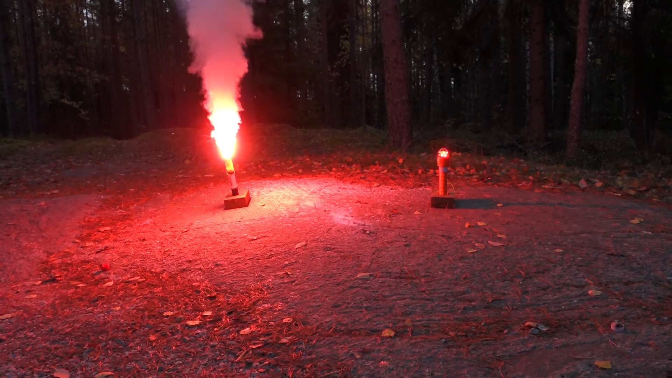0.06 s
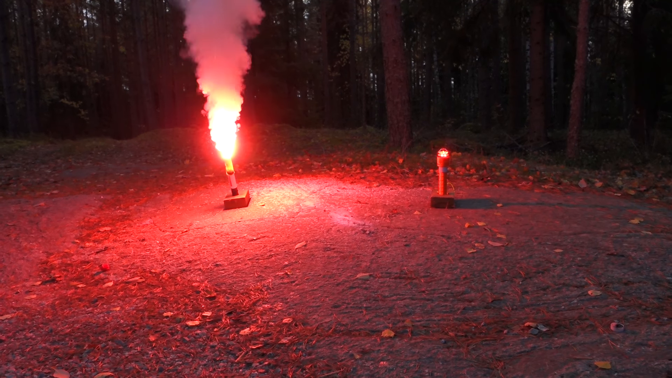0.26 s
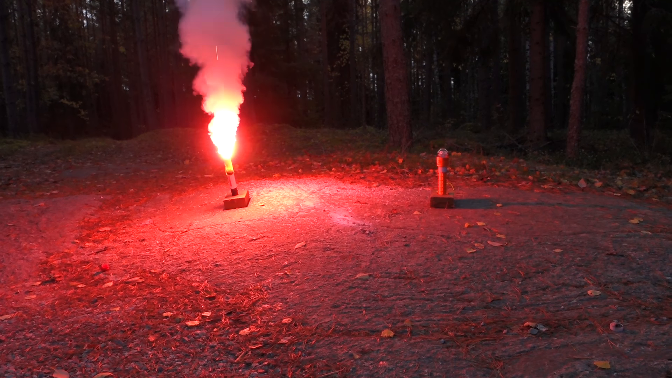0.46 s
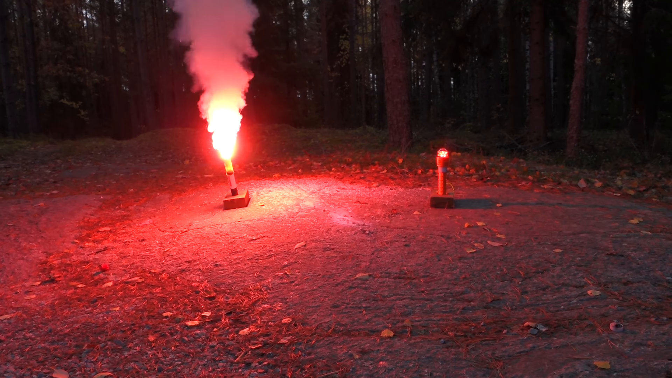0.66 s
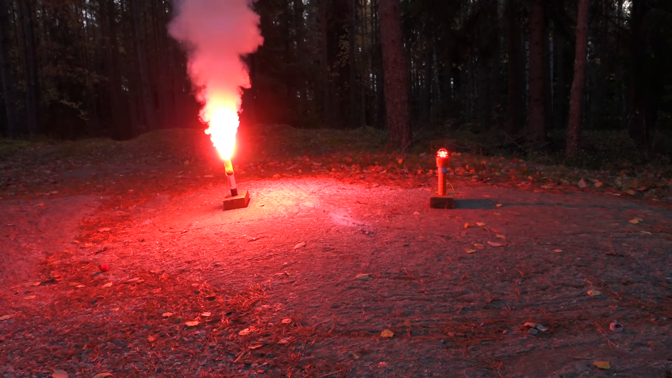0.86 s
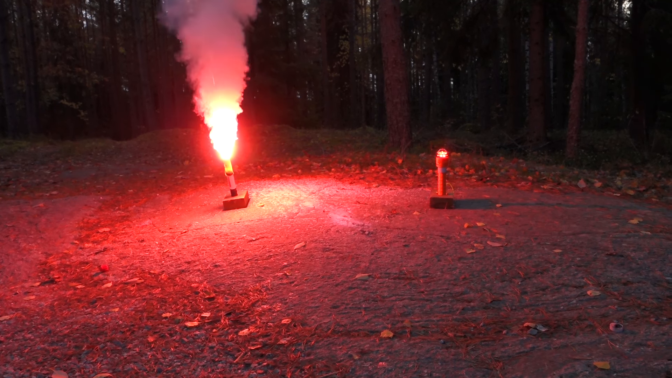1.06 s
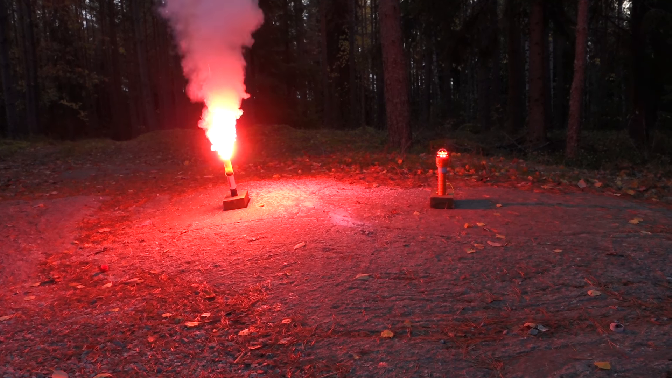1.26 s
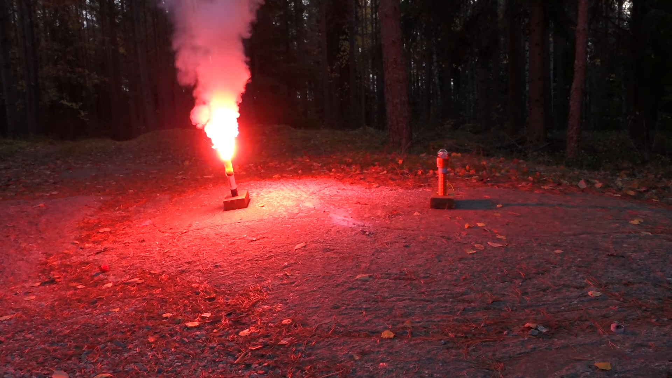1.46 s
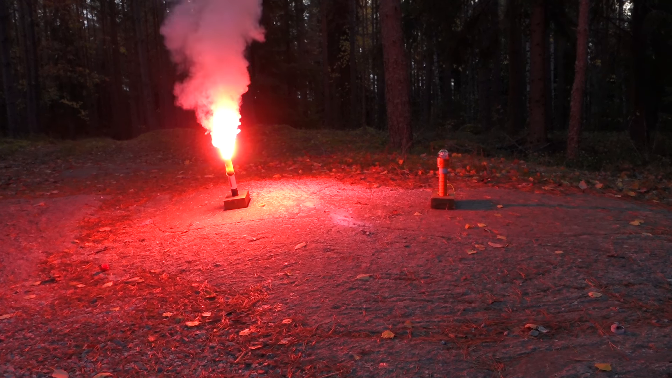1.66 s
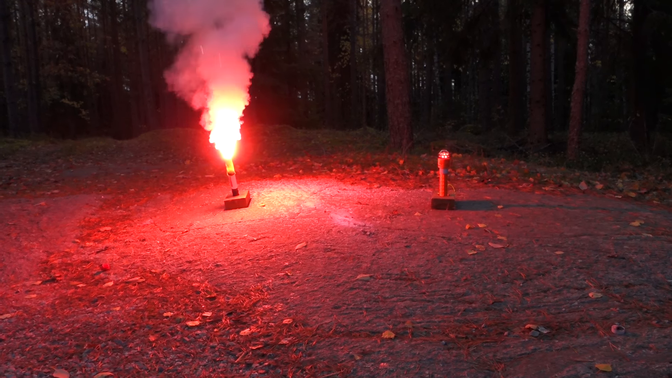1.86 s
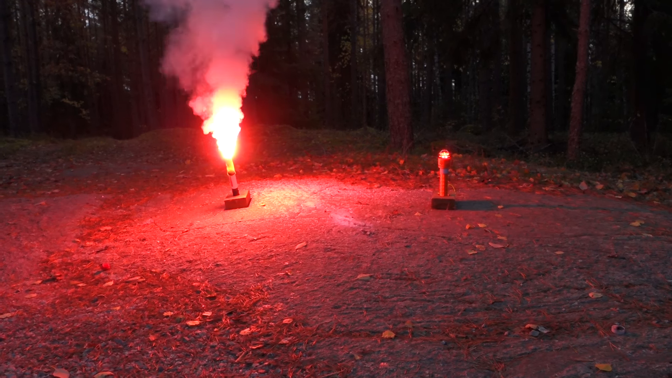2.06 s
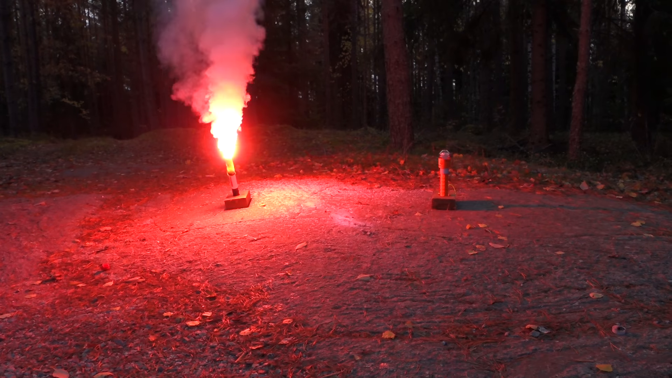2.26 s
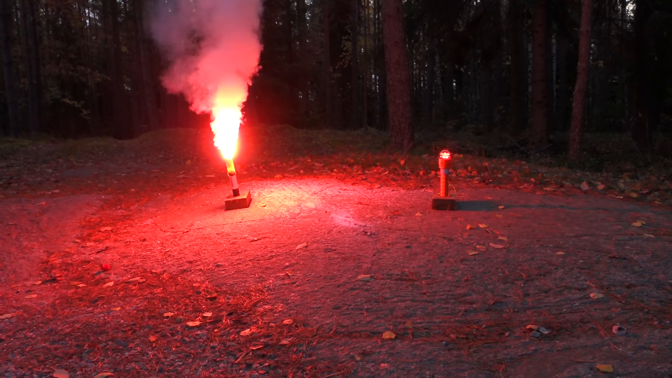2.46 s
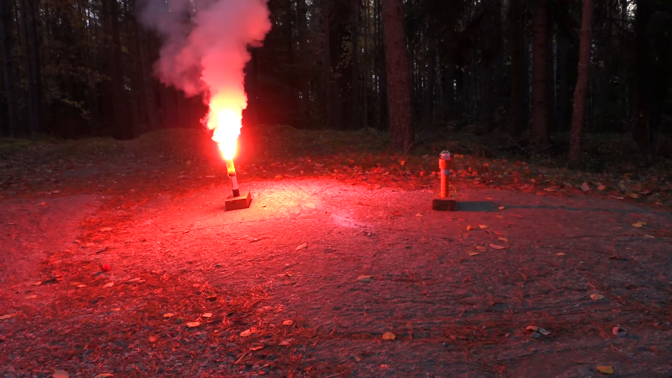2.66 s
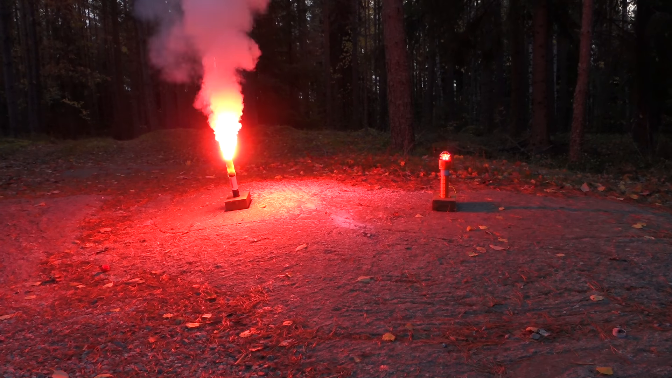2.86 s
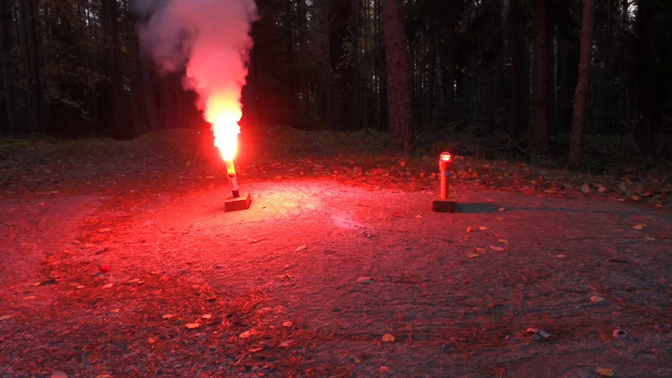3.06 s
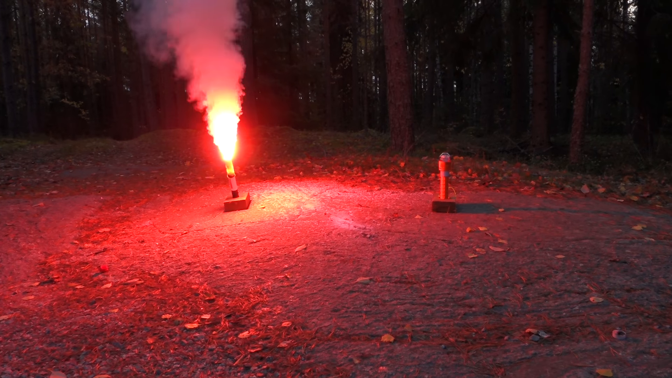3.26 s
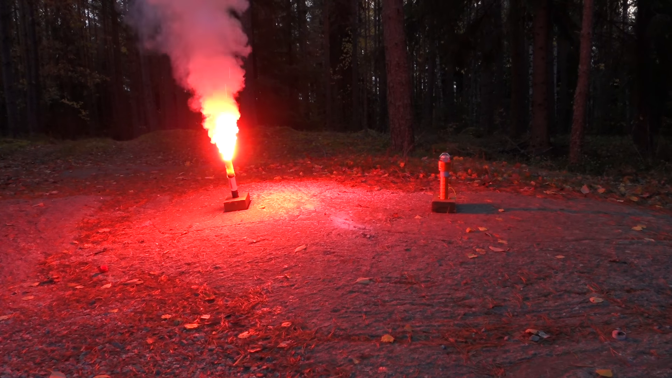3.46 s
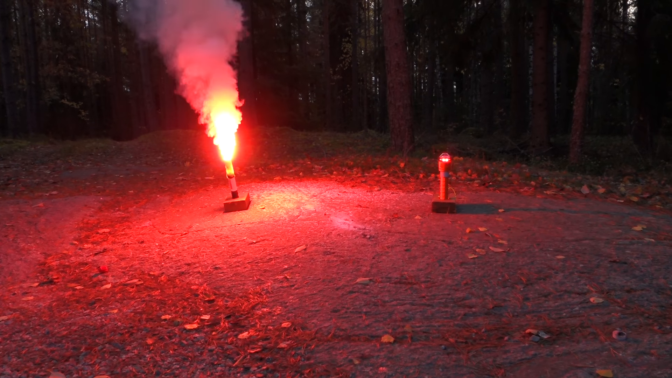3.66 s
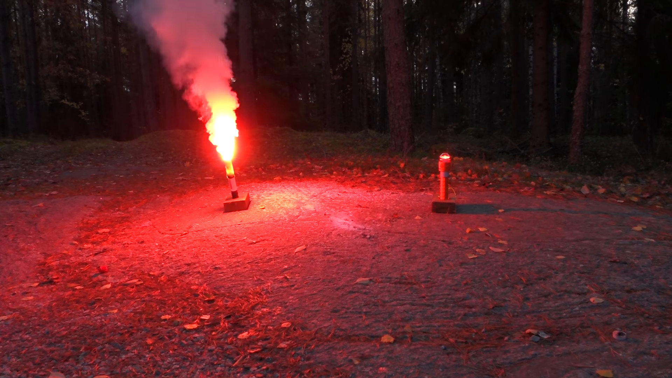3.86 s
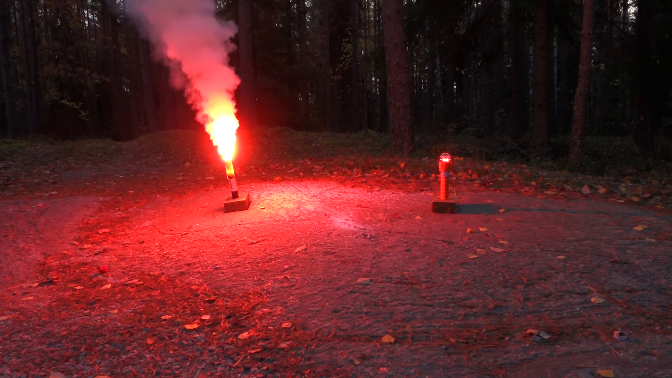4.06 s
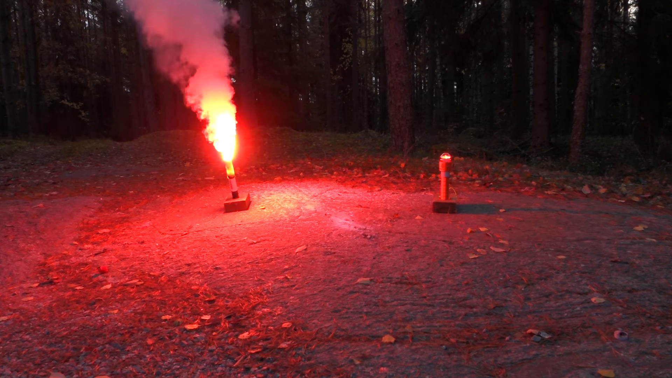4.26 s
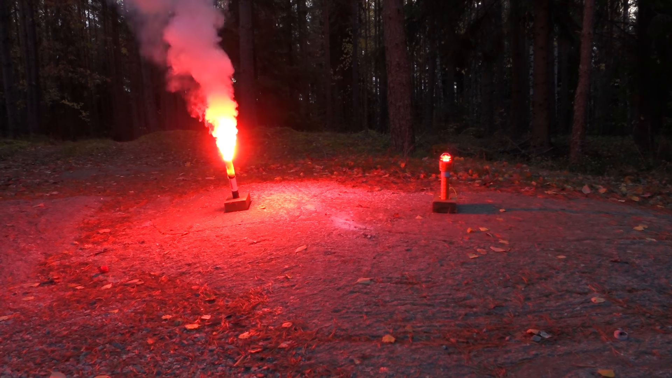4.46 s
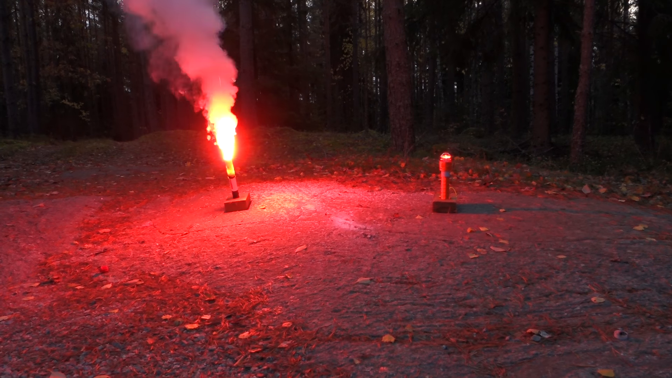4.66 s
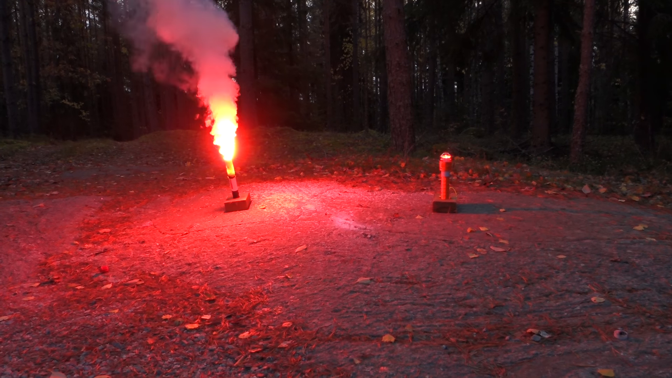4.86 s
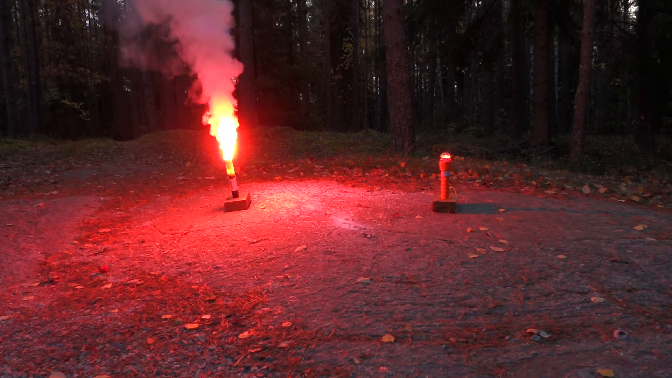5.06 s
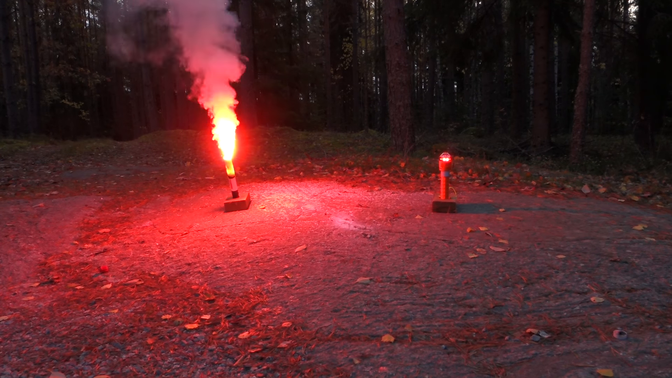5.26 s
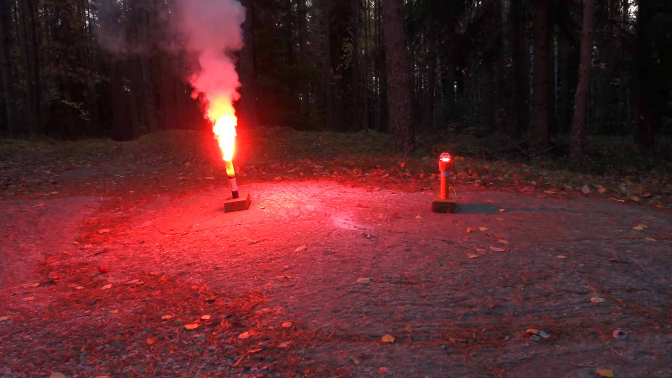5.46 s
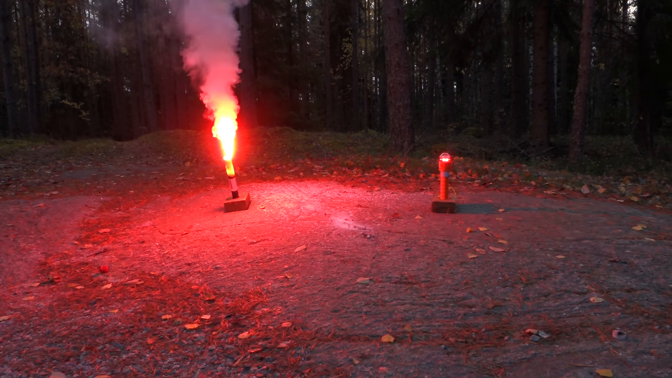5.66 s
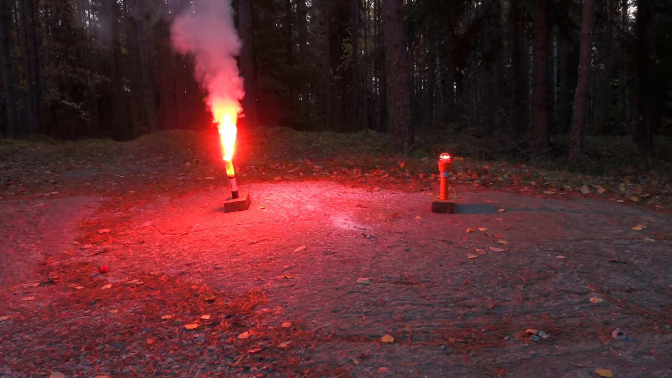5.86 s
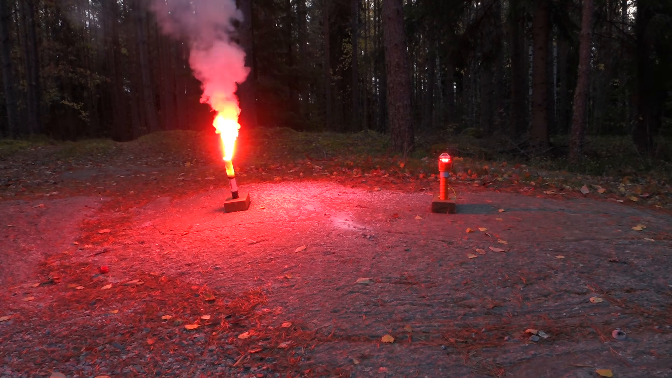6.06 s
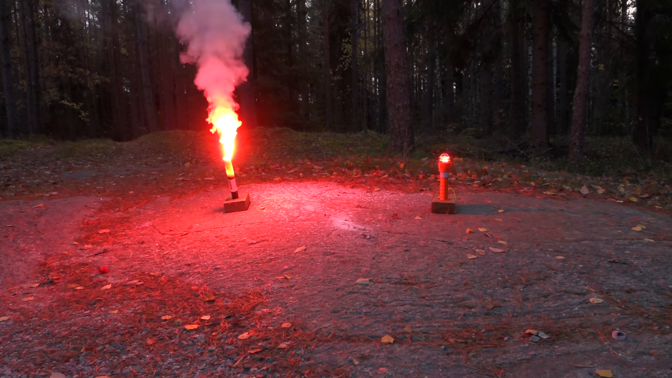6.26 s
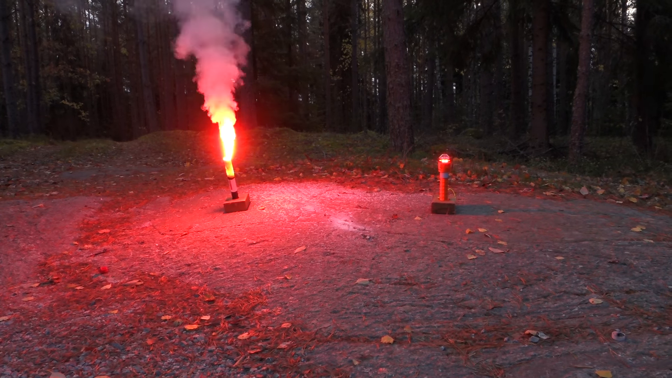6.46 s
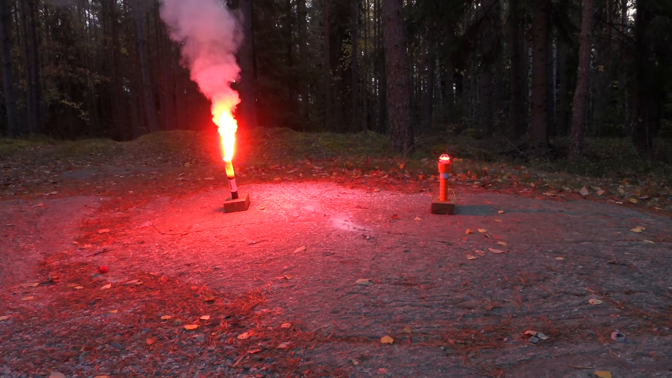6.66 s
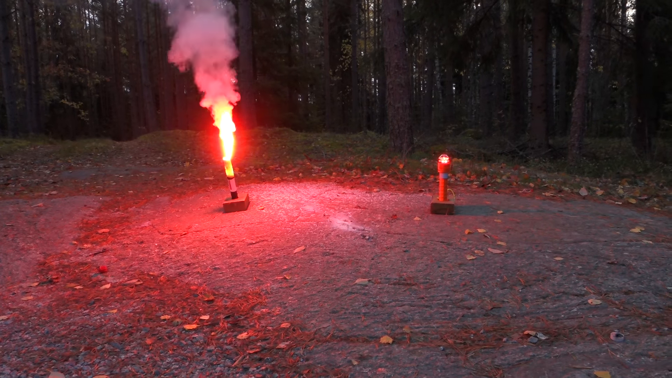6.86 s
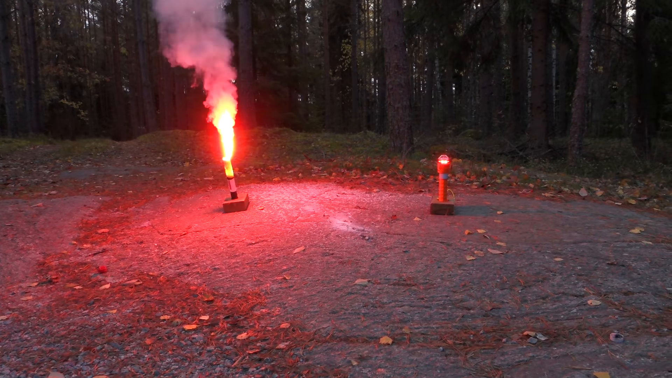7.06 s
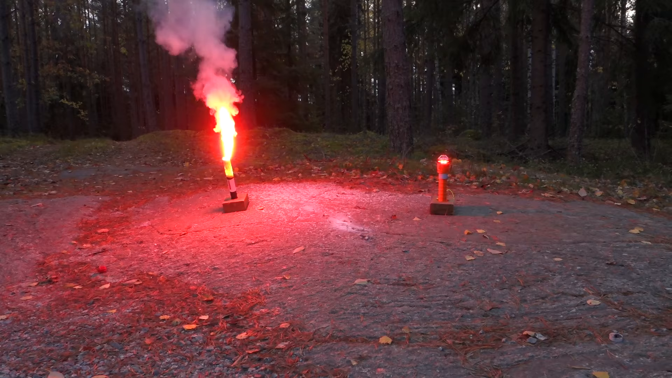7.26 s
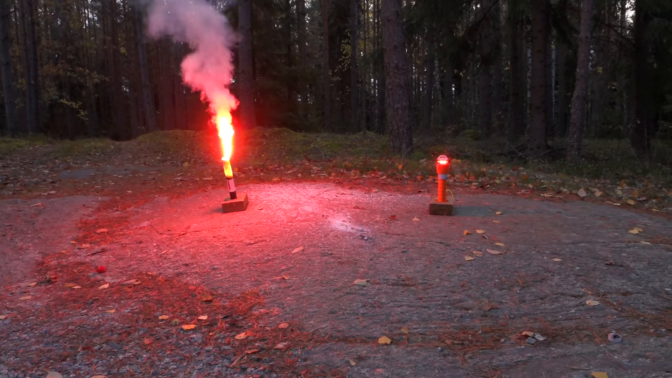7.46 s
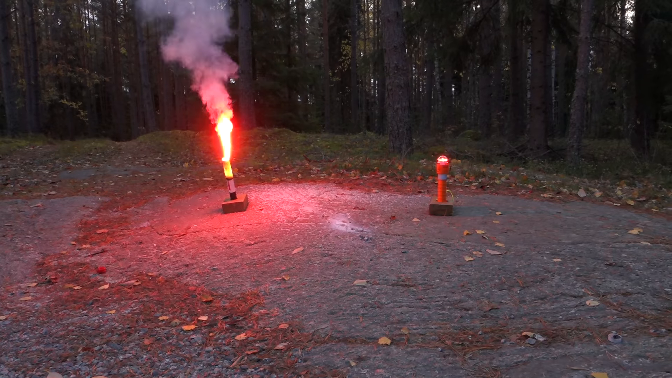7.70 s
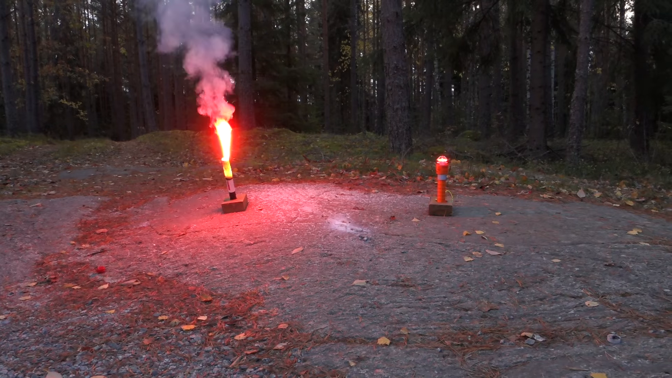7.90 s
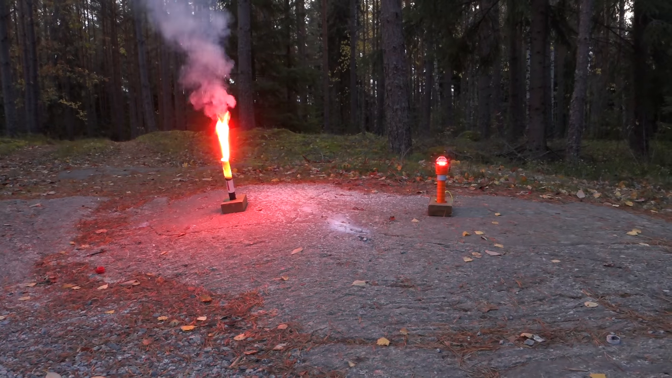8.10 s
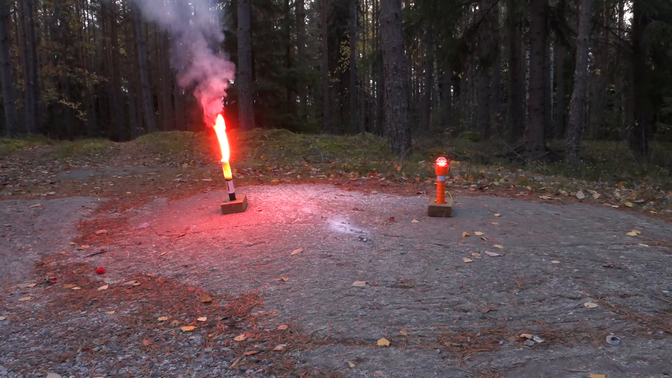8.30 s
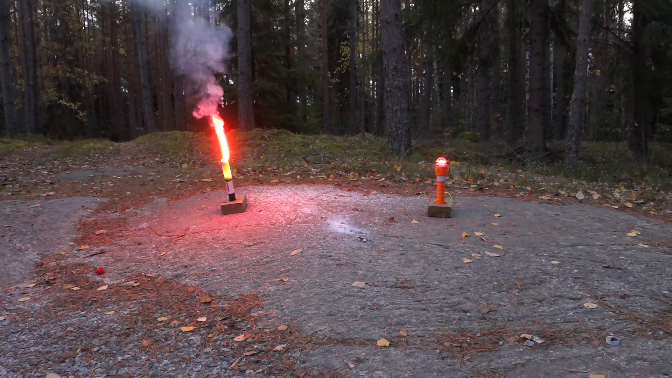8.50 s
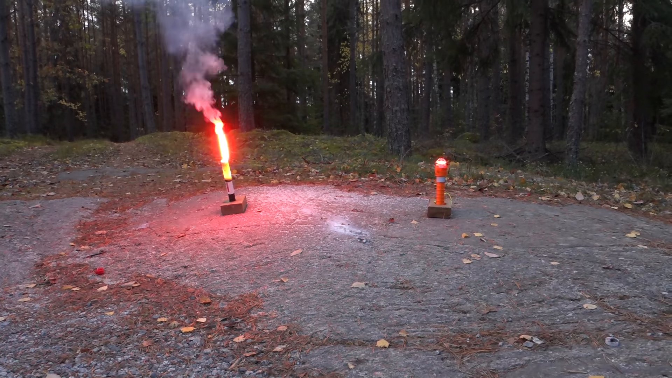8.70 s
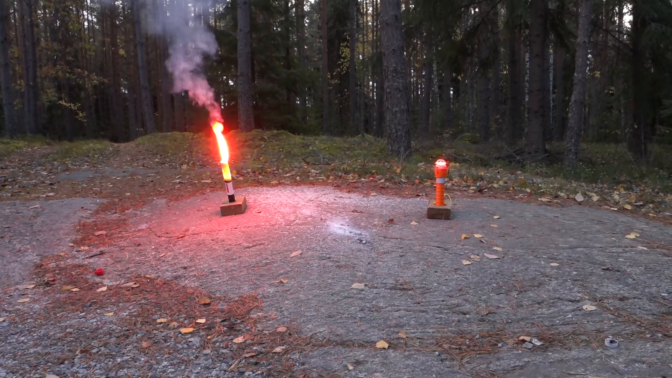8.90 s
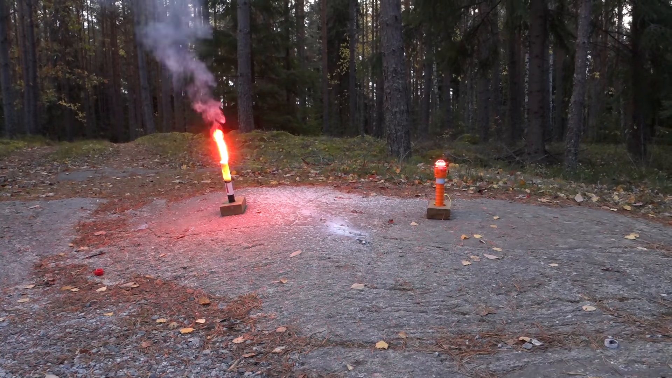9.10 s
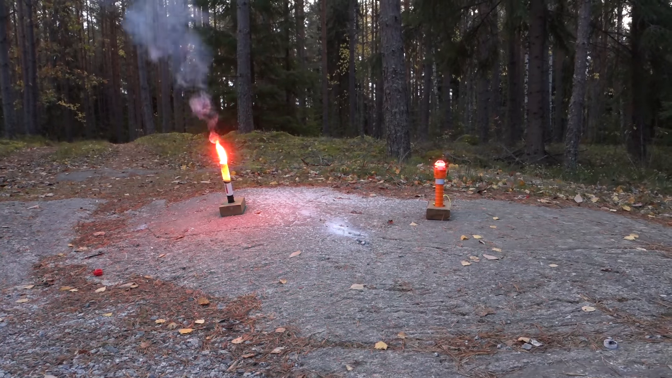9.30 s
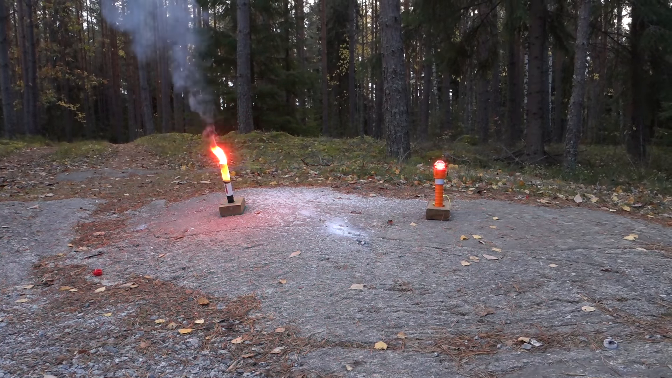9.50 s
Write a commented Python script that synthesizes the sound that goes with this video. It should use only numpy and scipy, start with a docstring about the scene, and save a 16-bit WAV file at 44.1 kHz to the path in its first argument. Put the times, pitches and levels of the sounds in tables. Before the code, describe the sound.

A hand flare burns a few metres away in a still forest clearing, with a loud, steady hiss over a rushing roar. After a few seconds it starts to weaken, surging unevenly and spitting tiny sparks as the hiss turns grittier. Light sizzling and small sharp pops follow as the flame sinks. It gives one last weak puff and dies, leaving only faint air.

```python
"""Hand flare dying in a forest.

A flare burns on a gravel clearing, a few metres from a camera, and slowly dies. Its plume roars,
its burning face hisses with tiny bursts that thin into a sputter, and slag sizzles, pops and spits.
The ground bounce cuts a comb of notches into the sound; the trees scatter a little of it back."""
import sys
import numpy as np
from scipy import signal
from scipy.fft import rfft, irfft, next_fast_len
from scipy.io import wavfile
from scipy.ndimage import map_coordinates

SR = 44100
rng = np.random.default_rng(int(sys.argv[2]) if len(sys.argv) > 2 else 0)


def materialize(psi):
    """Save the field psi as 16-bit PCM at rate SR to the path in sys.argv[1].

    A 1-D psi becomes a single channel; in a 2-D psi each row is a channel.
    """
    bounded = np.clip(np.atleast_2d(psi).T, -1, 1)
    quanta = np.round(bounded * 32767).astype(np.int16)
    wavfile.write(sys.argv[1], SR, quanta)


N = 420704

# Burst density on the burning face: time_s, rate_per_s
BURST_RATE = [(0, 40000), (3.5, 38300), (5, 19000), (6.5, 11400), (7.6, 7100), (8.3, 4000), (9.5, 3200)]
# Fizz and sizzle spectrum: freq_hz, relative_db
FIZZ_SPECTRUM = [(2000, -41), (5000, -2), (8300, -2.5), (10000, -8.5), (12500, -11.5), (15800, -17)]


def flame(collapse_db=-11, puff_s=8.86):
    """One gas flow drives all: fizz dies first, the plume roars until it collapses, hiss lasts longest."""
    # Source spectra: freq_hz, relative_db
    roar_spectrum = [(25, -48), (55, -41.5), (110, -22), (190, -12.5), (310, -1.5), (520, -0.5),
                     (780, -1.5), (1050, -1), (1600, -5.5), (2600, -11), (4500, -45.5)]
    hiss_spectrum = [(100, -43.5), (300, -18.5), (600, -13.5), (1100, 1), (1900, 0.5), (2700, 1.5),
                     (4100, -3), (5500, -10), (6800, -12), (8500, -17.5), (11000, -28.5), (16000, -40)]
    burn_db = burn()
    rate_per_s = curve(BURST_RATE)
    roar_db = -28.5 + .42 * burn_db + 1.41 * np.minimum(burn_db - collapse_db, 0)
    plume = amp(roar_db) + amp(-63) * swell(puff_s, length_s=.14)  # flares up once more
    unevenness = (BURST_RATE[0][1] / rate_per_s) ** .41  # fewer bursts, less even flow
    flutter_db = .68 * unevenness * (wobble(70) + .1 * wobble(20))
    roar = plume * amp(.5 * flutter_db) * coloured(rng.standard_normal(N), roar_spectrum)
    hiss = amp(-22 + burn_db + flutter_db) * coloured(crackle(rate_per_s), hiss_spectrum)
    fizz_db = -33.5 + 2.3 * burn_db + flutter_db + .75 * wobble(120)
    fizz = amp(fizz_db) * coloured(crackle(rate_per_s), FIZZ_SPECTRUM)
    return roar + hiss + fizz


def burn():
    """Burn strength in dB re full burn: a slow decline, with gas surges as the charge burns unevenly."""
    # Decline: time_s, strength_db
    decline = [(0, -0.1), (2.2, 0.52), (2.75, -0.5), (3.45, -0.5), (4.25, -5.5), (5.1, -9.5), (5.8, -11.6),
               (6.8, -13), (7.0, -14), (7.53, -14.5), (7.61, -17.5), (8.05, -20.5), (8.18, -25.5),
               (8.45, -25.5), (8.73, -35.5), (8.78, -38.5), (9.05, -42), (9.2, -59)]
    # Gas surges: centre_s, length_s, extra_db
    surges = [(3.8, .12, 1.3), (4.063, 0.088, 2), (4.39, 0.13, 2.5), (4.889, 0.14, 1.8),
              (6.048, 0.094, 1.5), (6.36, 0.17, 1), (6.653, .08, 1.6), (8.72, 0.093, 5.5)]
    return curve(decline) + sum(db * swell(centre_s, length_s) for centre_s, length_s, db in surges)


def sizzle(peak_s=6.95, rise_db_per_s=15, fall_db_per_s=7):
    """Slag gathers in the tube, sizzles in fits, then cools."""
    t = np.arange(N) / SR - peak_s
    level_db = -53.5 + np.minimum(rise_db_per_s * t, -fall_db_per_s * t) + 2 * wobble(17)
    return amp(level_db) * coloured(crackle(curve(BURST_RATE)), FIZZ_SPECTRUM)


def pops(decay_cycles=.38, gain_db=6, highpass_hz=650):
    """Gas pockets in the slag burst, each one heavily damped pressure swing, too small to radiate bass."""
    # Gas pockets: start_s, relative_db, pitch_hz
    pockets = [(6.2553, -17.5, 4600), (6.928, -20, 1890), (7.147, -21, 1640), (7.362, -29, 2090),
               (7.392, -34, 2130), (7.417, -15.5, 2160), (7.447, -20, 2460), (7.5158, -17.5, 1870),
               (7.559, -25, 2380), (7.892, -30, 2040), (8.022, -31, 1870), (8.042, -28, 2180),
               (8.244, -31, 2250), (8.4053, -31, 2230), (8.4382, -29.5, 2150), (8.523, -28.5, 3940),
               (8.536, -39, 1880), (8.722, -47, 2470), (8.865, -51, 1870), (8.91, -47, 1750)]
    out = np.zeros(N + SR)
    t = np.maximum(np.arange(SR // 100) / SR - .0008, 0)
    for start_s, db, hz in pockets:
        swing = np.sin(2 * np.pi * hz * t) * np.exp(-hz * t / decay_cycles)
        out[round(start_s * SR):][:len(t)] += amp(db + gain_db) * swing / np.abs(swing).max()
    return signal.sosfilt(signal.butter(2, highpass_hz, "highpass", fs=SR, output="sos"), out[:N])


def sparks(crest_s=.0018, width_s=.00047, gain_db=-3.5, fade_db_per_s=5, faint_count=36):
    """Sparks spit from the tube, each a bright puff of about 2 ms; faint ones fly between the loud."""
    # Loud sparks: start_s, relative_db
    loud = [(4.1944, -21.5), (4.385, -29.5), (4.6824, -25.5), (4.7785, -22.5), (4.8634, -30),
            (4.9994, -21.5), (5.1974, -25.5), (5.386, -13.5), (5.7967, -24), (5.9813, -29), (6.8325, -21),
            (6.984, -28), (8.0182, -32)]
    # Spark spectrum: freq_hz, gain_db
    spectrum = [(1500, -22), (4000, 0), (7000, 0), (11000, -4), (16000, -5)]
    out = np.zeros(N + SR)
    t = np.arange(SR // 100) / SR
    puff = np.exp(-((t - crest_s) / width_s) ** 2)
    faint_s = rng.triangular(3.7, 4.4, 7, faint_count)  # thickest as the burn starts to fail
    faint_db = -27.5 + 2 * rng.standard_normal(faint_count) - fade_db_per_s * (faint_s - faint_s.min())
    for start_s, db in [*loud, *zip(faint_s, faint_db)]:
        out[round(start_s * SR):][:len(t)] += amp(db + gain_db) * puff * rng.standard_normal(len(t))
    return filtered(out[:N], lambda hz: amp(along(spectrum, hz)))


def ground_bounce(x, delay_s=.0004338, phase_rad=.76, blur=.067):
    """The gravel's reflection: later than the direct sound, duller and turned in phase."""
    # Gravel reflection: freq_hz, gain
    gravel = [(100, 0.79), (1000, 0.66), (3200, 0.67), (8000, 0.31), (15000, 0.13)]
    reflected = filtered(
        x, lambda hz: along(gravel, hz) * np.exp(-1j * (2 * np.pi * hz * delay_s + phase_rad)))
    # A tall flame spreads the bounce over many paths, so the notches deepen as it shrinks.
    flame_height = amp(burn())
    return (1 - blur * flame_height) * reflected


def forest_scatter(x):
    """Gravel and trunks scatter sound by countless paths: energy lingers, phase is random on each side."""
    # Scattered spectrum: freq_hz, gain_db
    scatter = [(120, -46), (300, -91), (600, -36), (1100, -6.5), (2000, -15), (4500, -4), (8000, -5.5),
               (15000, 2)]
    # Reverberation: freq_hz, t60_s
    reverb_time = [(200, 0.68), (2000, 0.49), (6000, 0.091), (14000, .03)]
    hz, t, spectra = signal.stft(x, SR, nperseg=256)
    decay = amp(-60 * t[t < .5] / along(reverb_time, hz)[:, None]) ** 2
    decay /= decay.sum(axis=1, keepdims=True)
    energy = signal.fftconvolve(np.abs(spectra) ** 2, decay, axes=1)[:, :len(t)]
    noise = signal.stft(rng.standard_normal((2, N)), nperseg=256)[2]
    wet = noise / noise.std() * np.sqrt(np.abs(energy)) * amp(along(scatter, hz))[:, None]
    return signal.istft(wet, nperseg=256)[1][:, :N]


def arrival_lag(x, lag_s=13e-6):
    """The flare stands to the left, so its sound reaches the left microphone first."""
    return filtered(x, lambda hz: np.exp(np.outer([1, -1], 1j * np.pi * hz * lag_s)))


def housing(x):
    """The camera's body colours the sound and favours one side or the other by frequency."""
    # Narrow peaks and dips: centre_hz, width_hz, gain_db
    resonances = [(537, 167, 5.5), (600, 25, -4), (740, 139, 9.5), (827, 38, -4), (952, 87, 4.5),
                  (983, 30, -22), (1099, 19, 3.5), (1335, 21, -8.5), (1850, 40, 3), (3410, 72, 4.5)]
    # Balance: freq_hz, left_minus_right_db
    balance = [(400, 0), (880, 1.2), (1030, 4.5), (1250, 1.6), (4500, .9), (5600, 2.6), (8000, 1.3),
               (10500, -.5), (14000, -1.4)]

    def response(hz):
        ripple_db = sum(db / (1 + (2 * (hz - centre) / width) ** 2) for centre, width, db in resonances)
        return amp(ripple_db + np.outer([.5, -.5], along(balance, hz)))
    return filtered(x, response)


def air():
    """Still forest air and microphone hiss: alike on both sides in the bass, unrelated in the treble."""
    # Noise floor: freq_hz, relative_db
    spectrum = [(25, -15), (90, -15), (190, -4), (550, 0.5), (800, -2.5), (1200, -0.5), (1370, -5.5),
                (1600, 1.5), (1780, 0), (2050, -7), (4000, -10.5), (11000, -13.5), (15500, -4.5),
                (16000, -24)]
    # Left-right likeness: freq_hz, correlation
    likeness = [(100, .85), (400, 1), (1200, 0.14), (3000, 0), (15000, 0)]

    def mid_side_gains(hz):
        angle_rad = np.arccos(np.clip(along(likeness, hz), -1, 1)) / 2
        return np.array([np.cos(angle_rad), np.sin(angle_rad)])
    mid, side = filtered(rng.standard_normal((2, N)), mid_side_gains)
    left_right_db = [[-59.9], [-58.1]]
    return amp(left_right_db) * coloured(np.array([mid + side, mid - side]), spectrum)


def whine(pitch_hz=15625, level_db=-75):
    """A faint thin tone from the camera's electronics."""
    return amp(level_db) * unit(np.sin(2 * np.pi * pitch_hz * np.arange(N) / SR))


def crackle(rate_per_s):
    """Random impulses at constant power: smooth when dense, gritty when sparse."""
    chance = np.clip(rate_per_s / SR, 1e-4, 1)
    return (rng.random(N) < chance) * rng.standard_normal(N) / np.sqrt(chance)


def swell(centre_s, length_s):
    """Gaussian bump of height 1."""
    return np.exp(-(2 * (np.arange(N) / SR - centre_s) / length_s) ** 2)


def wobble(knots_per_s):
    """Smooth random curve."""
    knots = rng.standard_normal(int(N * knots_per_s / SR) + 4)
    return map_coordinates(knots, [np.arange(N) * knots_per_s / SR])


def amp(db):
    """Decibels to gain."""
    return 10 ** (np.asarray(db) / 20)


def unit(x):
    """x at rms 1."""
    return x / np.sqrt(np.mean(x ** 2) + 1e-20)


def along(points, hz):
    """(freq_hz, value) points read on a log axis."""
    freq_hz, values = np.transpose(points)
    return np.interp(np.log(hz + 1), np.log(freq_hz + 1), values)


def curve(points):
    """(time_s, value) points read at every sample."""
    return np.interp(np.arange(N) / SR, *np.transpose(points))


def filtered(x, response):
    """x through a complex frequency response."""
    size = next_fast_len(N + SR // 2)
    return irfft(rfft(x, size) * response(np.fft.rfftfreq(size, 1 / SR)), size)[..., :N]


def coloured(x, spectrum):
    """x shaped by a dB spectrum, at rms 1."""
    return unit(filtered(x, lambda hz: amp(along(spectrum, hz))))


def scene():
    """The flare over gravel and among trees, above the quiet air."""
    flare = flame() + sizzle() + pops() + sparks()
    ground = ground_bounce(flare)
    heard = housing(arrival_lag(flare + ground) + forest_scatter(flare + .5 * ground))
    return heard + air() + whine()


def record(dry, cutoff_hz=15900):
    """The camera's band limit: a brick-wall low-pass."""
    return filtered(dry, lambda hz: hz < cutoff_hz)


dry = scene()
out = record(dry)
materialize(out)
```